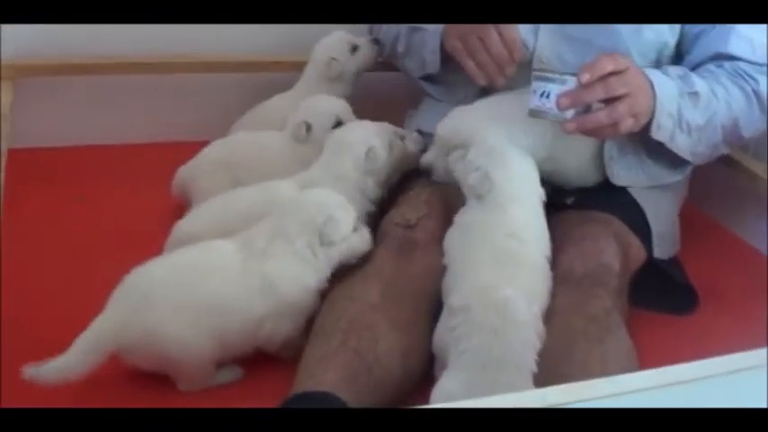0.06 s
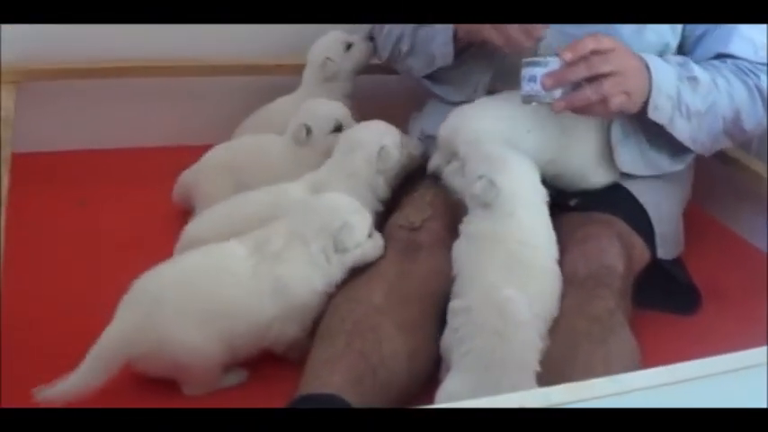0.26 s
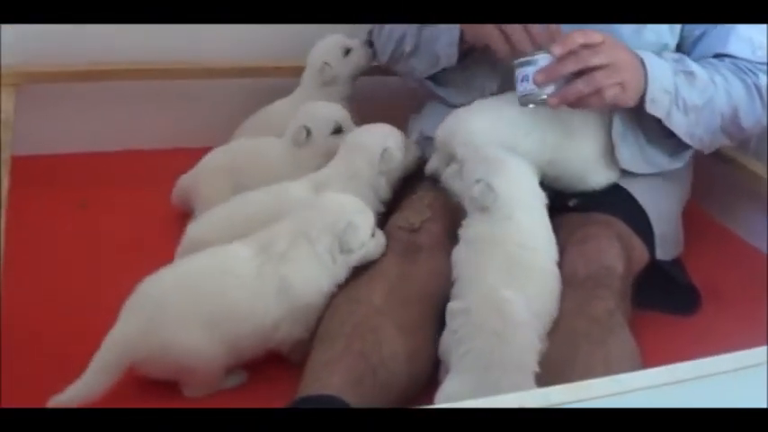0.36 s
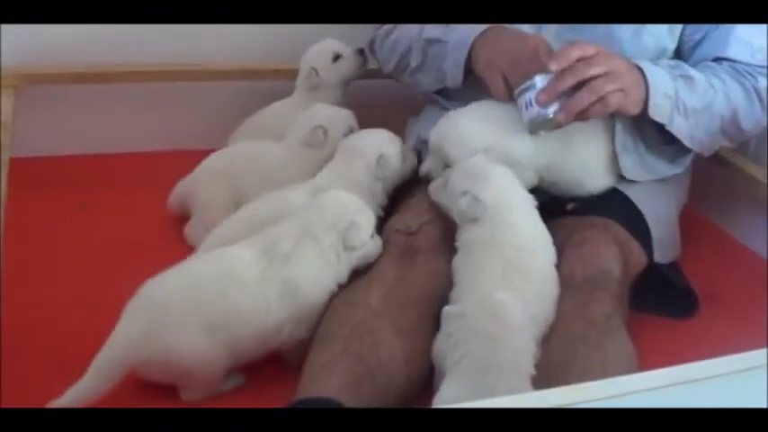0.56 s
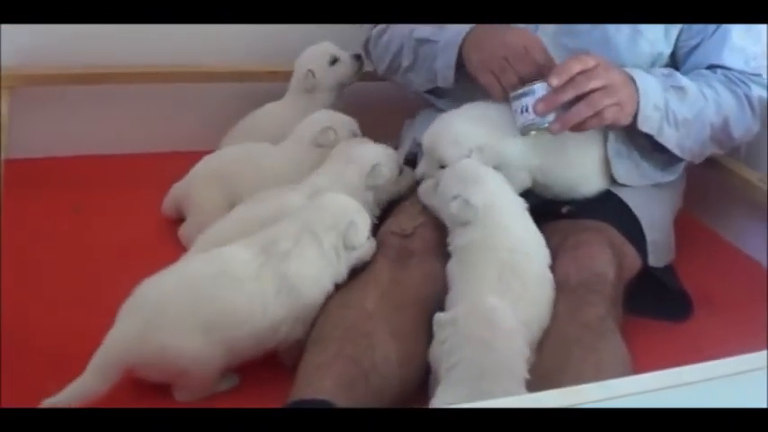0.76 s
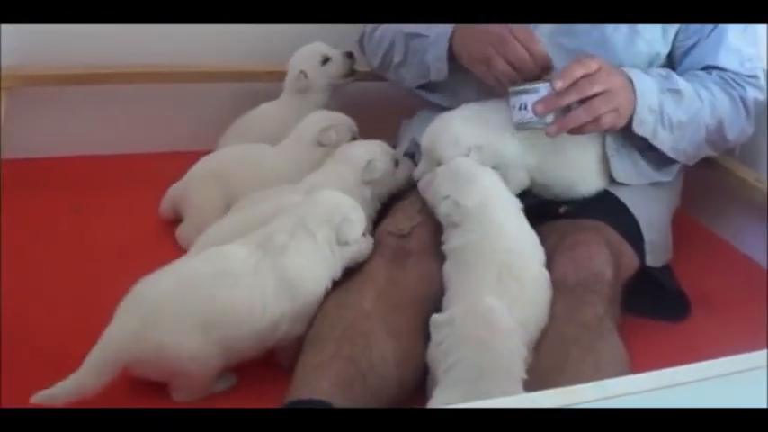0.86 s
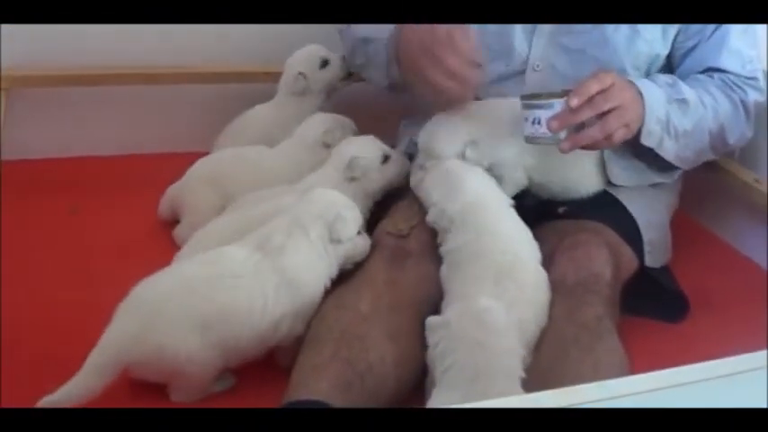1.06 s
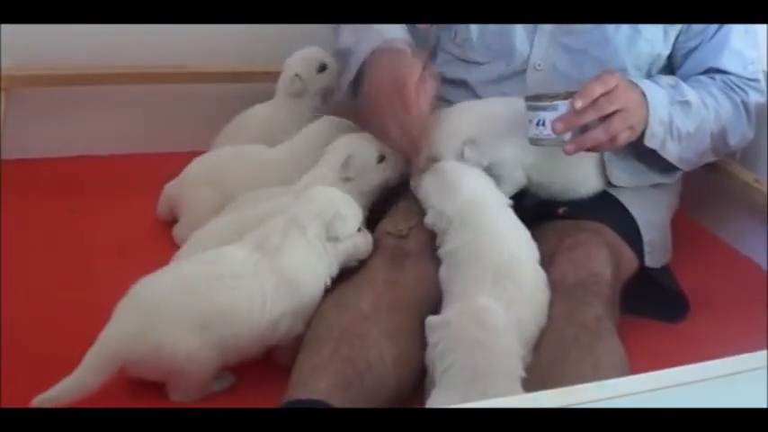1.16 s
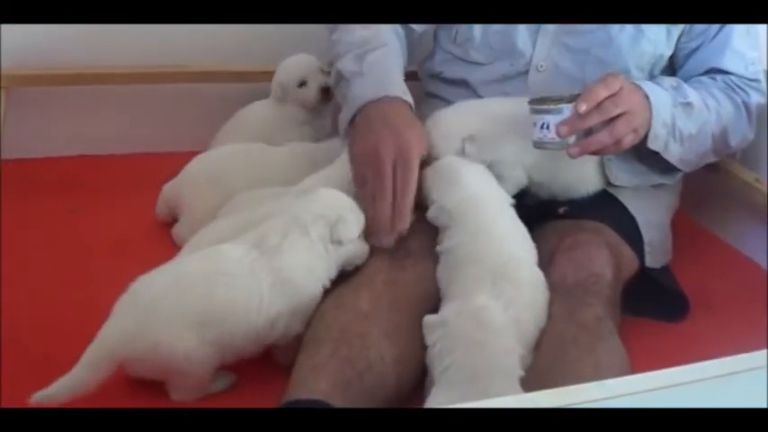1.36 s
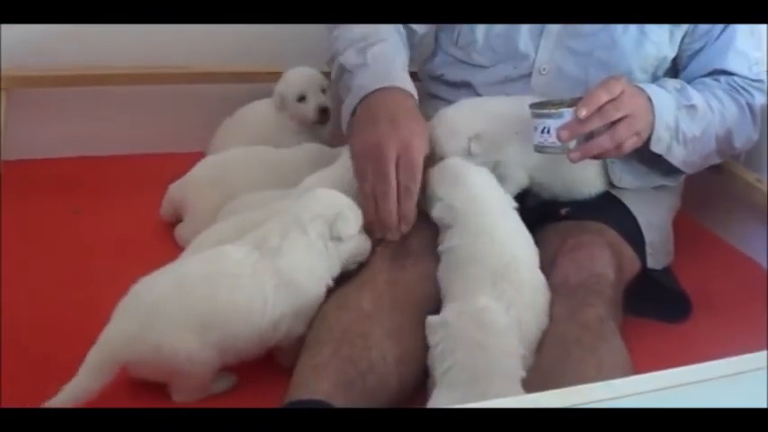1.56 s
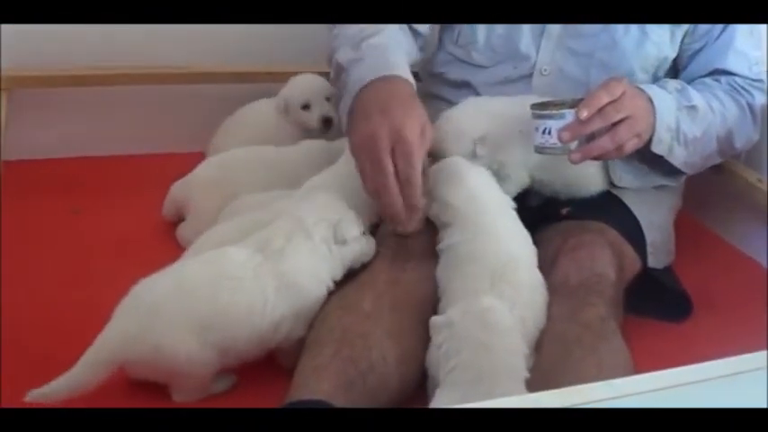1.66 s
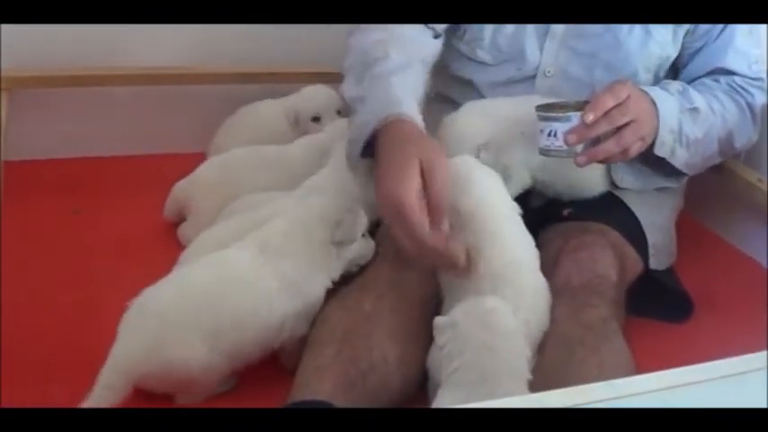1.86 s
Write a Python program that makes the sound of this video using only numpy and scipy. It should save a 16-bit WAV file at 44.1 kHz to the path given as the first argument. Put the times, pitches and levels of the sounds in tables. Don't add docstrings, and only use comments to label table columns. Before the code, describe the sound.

Puppies give four close, high whines, the third a loud open yelp, with brief distant whimpers before and after; soft paw scuffs, thumps and lip clicks in a reverberant room, with steady microphone hiss.

```python
import sys
import numpy as np
from scipy import signal
from scipy.fft import rfft, irfft
from scipy.io import wavfile
from scipy.ndimage import uniform_filter1d

SR = 44100
rng = np.random.default_rng(int(sys.argv[2]) if len(sys.argv) > 2 else 0)


def convert_level_to_amplitude(level_db):
    exponent = np.asarray(level_db, float) / 20
    return 10 ** exponent


def wav_record(signal):
    frames = np.transpose(np.atleast_2d(signal))
    bounded = np.clip(frames, -1, 1)
    quanta = np.round(bounded * 32767).astype(np.int16)
    wavfile.write(sys.argv[1], SR, quanta)


N = 83790

# [t/s, f/Hz, level/dB, mouth opening/0-1]
CRY_1 = [
    (.213, 1036, -43, 0.9),
    (0.229, 1025, -33, 0.63),
    (0.246, 1033, -24, 0.73),
    (0.269, 1121, -27, 0.91),
    (0.289, 1120, -27, 0),
    (0.308, 1143, -35.5, 0.03),
    (0.334, 1155, -41, 0.3),
    (.35, 1017, -33.5, .1),
]
CRY_2 = [
    (.478, 1041, -37, 0.68),
    (0.499, 1040, -32, 0.77),
    (.536, 1233, -25, 1.0),
    (0.56, 1222, -24.5, 0.27),
    (.585, 1215, -28, 0.47),
    (0.607, 1123, -33, 0.3),
    (.64, 1057, -31, 0.076),
]
YELP_3 = [
    (.787, 1056, -47, 0.23),
    (0.804, 1047, -31.5, 0.5),
    (.828, 1161, -27, 0.83),
    (.852, 1209, -18.5, 0.96),
    (0.906, 1220, -15.5, 0.8),
    (.925, 1166, -26, 0.84),
    (0.944, 1118, -24, 0.68),
    (0.987, 1090, -32, 0.72),
    (1.02, 1009, -34, 0.32),
]
CRY_4 = [
    (1.178, 1004, -46.5, 0.84),
    (1.199, 990, -38.5, 1.34),
    (1.225, 1012, -34, 0.88),
    (1.25, 1001, -30, 0.97),
    (1.27, 926, -26.5, 0.85),
    (1.289, 839.3, -29, 0.7),
    (1.308, 798.8, -35, .3),
    (1.335, 815, -34, 0.05),
]
CRY_PANS_DB = [6.5, 5.4, 3.6, 7.6]
CRY_ROUGHNESS = [0.099, 0.11, 0.031, 0.047]
# [t/s, f/Hz, level/dB]
FAR_WHIMPERS = [
    [(.01, 1040, -43), (.017, 985, -37.5), (.026, 799, -33.5), (.045, 775, -45), (.065, 824, -42),
     (.082, 780, -43)],
    [(1.551, 764, -38), (1.568, 891.3, -32.5), (1.59, 901.7, -32.5), (1.6, 824.5, -35), (1.612, 704, -37.5),
     (1.622, 670, -53)],
    [(1.825, 787, -31), (1.838, 890, -38.5), (1.848, 791, -38), (1.857, 705, -37), (1.87, 670, -46)],
]

# [f/Hz, level/dB]
THROAT_SHUT = [(800, 1), (1200, -4), (2200, -21), (4000, -32), (12000, -35.5)]
# [f/Hz, level/dB]
THROAT_OPEN = [(1100, -3.5), (2200, 0), (3500, 2.5), (4500, 8), (5800, 10.5), (7000, -7.5), (12000, -39)]
# [f/Hz, level/dB]
THROAT_WIDE = [(1200, -25), (2430, -9.5), (3600, -6), (4860, -1), (6000, -5), (7300, -27), (9700, -30.5),
               (11000, -41)]
# [f/Hz, level/dB]
THROAT_NASAL = [(1000, -8.5), (2000, -10.5), (3000, -8.5), (4000, 2.5), (5000, 2.5), (6000, -1.5),
                (9000, -32), (12000, -35)]
# [f/Hz, level/dB]
THROAT_FAR = [(800, -0.5), (1700, -0.5), (2600, -10), (6000, -25), (12000, -58)]
# [f/Hz, width/Hz, level/dB]
PEAKS_OPEN = [(3340, 81, 9.2), (5630, 250, 6.4), (6270, 210, 7.6)]
# [f/Hz, width/Hz, level/dB]
PEAKS_ROUND = [(3600, 210, 7.5), (6000, 220, 6.6)]
# [f/Hz, width/Hz, level/dB]
PEAKS_WIDE = [(2460, 146, 11), (3560, 205, 6.5), (5090, 290, 10.5), (7330, 300, 12), (9770, 260, 7)]
# [f/Hz, width/Hz, level/dB]
PEAKS_NASAL = [(4110, 160, 3.37)]

# [t/s, length/s, level/dB, tilt/dB per octave]
PAW_SCUFFS = [
    (0.29, 0.051, -35, 1.5),
    (0.579, 0.038, -37.5, 1.5),
    (0.719, 0.033, -48.5, -6),
    (0.847, 0.023, -37, 4),
    (1.037, 0.015, -31, 1),
    (1.263, 0.09, -41.5, 2.5),
]
# [f/Hz, level/dB]
GRIT_SPECTRUM = [(100, -20.5), (300, 0), (1500, -14), (4600, -2.5), (7000, -18), (15000, -37)]
# [t/s, level/dB, treble/dB per octave]
FLOOR_THUMPS = [
    (.445, -39.5, -4.5),
    (.655, -62, 3),
    (.99, -37.5, -9),
    (1.07, -43.5, -5),
]
# [f/Hz, level/dB, t60/s]
BOARD_MODES = [(179.3, -0.5, 0.45), (217, 1, 0.25), (245, -2.5, 0.17), (300, 7.5, 0.12),
               (408.4, 9.5, 0.091), (563, 2, 0.16)]
# (t/s, length/s, level/dB, first f/Hz, last f/Hz)
LOW_GLIDE = (1.6, 0.06, -43, 195, 249)
# [t/s, peak level/dB, f/Hz]
LIP_CLICKS = [(0.0667, -40.5, 7000), (0.128, -43.5, 8250), (0.1344, -40, 8140), (0.3348, -33, 4700),
              (0.5084, -38, 5920), (0.48, -38, 1500), (0.5656, -30.5, 7950), (0.587, -28, 3500),
              (0.598, -28, 5070), (1.1605, -43, 6000), (1.177, -34, 4000), (1.5174, -49, 9240),
              (1.665, -51, 4200), (1.4174, -35, 7460), (1.5561, -36, 7000), (1.7534, -37, 6260)]
# [t/s, length/s, level/dB, first f/Hz, last f/Hz]
NOSE_WHISTLES = [
    (1.33, 0.13, -49.5, 13700, 14200),
    (1.496, 0.17, -56, 14000, 15260),
    (1.74, .07, -51, 13800, 13800),
    (1.007, 0.017, -43, 12000, 11200),
    (1.606, 0.013, -40.5, 12300, 11650),
    (1.858, 0.014, -43, 12100, 11700),
]

# [f/Hz, level/dB]
HISS_SPECTRUM = [(15, -47), (25, -23), (88, -7.5), (492, -14), (963, -4.5), (1190, -10.5), (6140, -13),
                 (14100, -30.5), (15300, -30)]
# [f/Hz, level/dB]
LOW_HUMS = [(69, -70), (100, -61.5)]
# [f/Hz, likeness/0-1]
HISS_LIKENESS = [(60, 1), (180, 0.8), (550, 0.36), (1650, 0.14), (4970, 0.062), (15000, 0.86)]
# [f/Hz, phase/rad]
PORT_PHASE = [(30, 0.011), (1500, 0.16), (3300, 1.4), (4300, 0.84), (4900, 2.22), (5500, 5.66), (6400, 5.1),
              (10200, 5.2)]
# [f/Hz, level/dB]
WALL_RETURN = [(200, -3.5), (1000, 2), (2500, -2.5), (6000, -2.5), (12000, 8.5)]
# [f/Hz, t60/s]
ROOM_T60 = [(200, 0.89), (1000, 0.5), (2500, 0.44), (6000, 0.42), (12000, 0.13)]
# [f/Hz, level/dB, t60/s]
STANDING_WAVES = [(1004, -1.5, 0.33), (908, -12.5, 0.56), (1107, -22, 0.6), (1222, -14.5, 0.38),
                  (826, -10, 0.37), (757, -11, 0.37)]

JITTER, EDGE_S, BREATH_DB = 0.0048, 0.0037, -24
WHIMPER_ROUGHNESS, WHIMPER_WET_DB, SMALL_WET = 0.17, 1.5, 0.36
CLICK_DB, CLICK_WIDTH_HZ, CLICK_DECAY_S = -1.5, 3800, 0.0034
HISS_DB, WHINE_HZ, WHINE_DB, HISS_LOW_CUT_HZ = -43.5, 15625, -61.5, 46
ROOM_DB, EAR_LIKENESS, EARLY_DB, EARLY_S = 0.37, 0.5, 2.5, 0.031
BUILD_S, STANDING_BUILD_S = 0.021, 0.053


def read(points, hz):
    f, value = np.transpose(points)
    return np.interp(np.log(hz + 1), np.log(f + 1), value)


def evened(x):
    return x / np.sqrt(np.mean(x ** 2) + 1e-20)


def add(mix, start_s, sound):
    part = mix[..., max(round(start_s * SR), 0):][..., :sound.shape[-1]]
    part += sound[..., :part.shape[-1]]


def coloured(x, gain):
    return irfft(rfft(x) * gain(np.fft.rfftfreq(x.shape[-1], 1 / SR)), x.shape[-1])


def hiss():
    frames, hz = N // 128 + 5, np.fft.rfftfreq(512, 1 / SR)
    a, b, c, d, patches = rng.standard_normal((frames, 257, 5)).T
    patches = uniform_filter1d(patches, size=8, axis=0)
    patches = evened(uniform_filter1d(patches, size=14, axis=1))
    flicker = evened(uniform_filter1d(rng.standard_normal(frames), size=3))
    same = read(HISS_LIKENESS, hz)[:, None]
    left = a + 1j * b
    right = same * left + np.sqrt(1 - same ** 2) * (c + 1j * d)
    level_db = read(HISS_SPECTRUM, hz)[:, None] + 3.4 * patches + 1.7 * flicker * (hz[:, None] / 16000)
    spectrum = np.array([left, right]) * convert_level_to_amplitude(level_db)
    noise = signal.istft(spectrum, nperseg=512, noverlap=384)[1][:, :N]
    t = np.arange(N) / SR
    hums = sum(convert_level_to_amplitude(db) * np.sin(2 * np.pi * f * t) for f, db in [*LOW_HUMS, (WHINE_HZ, WHINE_DB)])
    return convert_level_to_amplitude(HISS_DB) * evened(noise) + hums


def voice(hz, level_db, mouth, rough, throat, peaks=()):
    n = len(hz)
    jitter = evened(uniform_filter1d(rng.standard_normal(n), size=150))
    turns = np.cumsum(hz * (1 + JITTER * jitter)) / SR
    flutter = uniform_filter1d(rng.standard_normal((11, 2, n)), size=120, axis=2) * np.sqrt(120)
    tone, power = np.zeros(n), 0
    for k in range(1, 12):
        gain_db = (1.5 - mouth) * read(THROAT_SHUT, k * hz) + mouth * read(throat, k * hz)
        for f, width_hz, db in peaks:
            gain_db = gain_db + db / (1 + ((k * hz - f) / width_hz) ** 2)
        gain = convert_level_to_amplitude(gain_db)
        share = np.clip(rough * k ** 0.48, 0, 1)
        smear = 1 - share + share * (flutter[k - 1, 0] + 1j * flutter[k - 1, 1])
        tone = tone + gain * (smear * np.exp(2j * np.pi * k * turns)).real
        power = power + gain ** 2 / 2
    breath = evened(coloured(rng.standard_normal(n),
                             lambda f: convert_level_to_amplitude(read(throat, f)) * f ** 2 / (f ** 2 + 1500 ** 2)))
    t = np.arange(n) / SR
    fade = np.clip(np.minimum(t, t[-1] - t) / EDGE_S, 0, 1)
    return convert_level_to_amplitude(level_db) * (tone / np.sqrt(power) + convert_level_to_amplitude(BREATH_DB) * mouth * breath) * fade


def whimpers():
    out = np.zeros(N)
    for rows in FAR_WHIMPERS:
        s, hz, db = np.transpose(rows)
        t = np.arange(s[0], s[-1], 1 / SR)
        note = voice(np.interp(t, s, hz), np.interp(t, s, db), 1.0, WHIMPER_ROUGHNESS, THROAT_FAR)
        add(out, s[0], note)
    return out


def lip_clicks():
    out, t = np.zeros(N), np.arange(1024) / SR
    for s, db, hz in LIP_CLICKS:
        puff = coloured(rng.standard_normal(1024), lambda f: 1 / (1 + ((f - hz) / CLICK_WIDTH_HZ) ** 2))
        add(out, s, convert_level_to_amplitude(db + CLICK_DB) * evened(puff) * np.exp(-t / CLICK_DECAY_S))
    return out


def cries():
    out = np.zeros((2, N))
    calls = (CRY_1, CRY_2, YELP_3, CRY_4)
    throats = (THROAT_OPEN, THROAT_OPEN, THROAT_WIDE, THROAT_NASAL)
    resonances = (PEAKS_OPEN, PEAKS_ROUND, PEAKS_WIDE, PEAKS_NASAL)
    for rows, throat, peaks, rough, pan_db in zip(calls, throats, resonances, CRY_ROUGHNESS, CRY_PANS_DB):
        s, *controls = np.transpose(rows)
        t = np.arange(s[0], s[-1], 1 / SR)
        hz, level_db, mouth = (np.interp(t, s, c) for c in controls)
        cry = voice(hz, level_db, mouth, rough, throat, peaks)
        add(out, s[0], cry * convert_level_to_amplitude(np.array([[pan_db / 2], [-pan_db / 2]])))
    return out


def scuffs():
    out = np.zeros(N)
    for s, length_s, db, tilt_db in PAW_SCUFFS:
        u = np.linspace(0, 1, round(length_s * SR))
        grit = rng.standard_normal(4096) * convert_level_to_amplitude(2.66 * rng.exponential(1, 4096))
        grit = evened(coloured(
            grit, lambda f: convert_level_to_amplitude(read(GRIT_SPECTRUM, f) + tilt_db * np.log2(f / 1000 + 0.12))))
        add(out, s, convert_level_to_amplitude(db) * grit[:len(u)] * np.sin(np.pi * u ** 0.69) ** 0.21)
    return out


def floor_board():
    out, t = np.zeros(N), np.arange(SR // 2) / SR
    for s, db, treble_db in FLOOR_THUMPS:
        ring = np.zeros(len(t))
        for hz, mode_db, t60_s in BOARD_MODES:
            decay_db = mode_db + treble_db * np.log2(hz / 200) - 60 * t / t60_s
            ring += convert_level_to_amplitude(decay_db) * np.sin(2 * np.pi * hz * t)
        add(out, s, convert_level_to_amplitude(db) * ring * np.minimum(t / 0.011, 1))
    s, length_s, db, first_hz, last_hz = LOW_GLIDE
    u = np.linspace(0, 1, round(length_s * SR))
    turns = np.cumsum(first_hz + (last_hz - first_hz) * u) / SR
    add(out, s, convert_level_to_amplitude(db) * np.sin(np.pi * u) * np.sin(2 * np.pi * turns))
    return out


def nose_whistles():
    out = np.zeros(N)
    for s, length_s, db, first_hz, last_hz in NOSE_WHISTLES:
        u = np.linspace(0, 1, round(length_s * SR))
        waver_hz = 120 * evened(uniform_filter1d(rng.standard_normal(8192), size=100))[:len(u)]
        hz = first_hz + (last_hz - first_hz) * np.sin(1.6 * u) + waver_hz
        add(out, s, convert_level_to_amplitude(db) * np.sin(np.pi * u ** 0.86) * np.sin(2 * np.pi * np.cumsum(hz) / SR))
    return out


def room(x):
    taps = np.zeros((2, SR))
    at = np.arange(200, SR - 20, 20) + rng.integers(0, 20, (2, (SR - 201) // 20))
    np.put_along_axis(taps, at, rng.choice([-1., 1.], at.shape), 1)
    taps[1] = EAR_LIKENESS * taps[0] + np.sqrt(1 - EAR_LIKENESS ** 2) * taps[1]
    t = np.arange(SR) / SR
    taps = taps * (1 + convert_level_to_amplitude(EARLY_DB) * np.exp(-t / EARLY_S) - np.exp(-t / BUILD_S))
    hz, frame_s, z = signal.stft(taps, SR, nperseg=256)
    z = z * convert_level_to_amplitude(-60 * frame_s / read(ROOM_T60, hz)[:, None])
    tail = signal.istft(z, SR, nperseg=256)[1]
    tail = tail / np.linalg.norm(tail[0])
    t = np.arange(tail.shape[1]) / SR
    phases = 2 * np.pi * rng.random((len(STANDING_WAVES), 2, 1)) * np.array([[1], [0]])
    for (f, db, t60_s), phase in zip(STANDING_WAVES, phases):
        swell = convert_level_to_amplitude(-60 * t / t60_s) * (1 - np.exp(-t / STANDING_BUILD_S))
        ring = swell * np.sin(2 * np.pi * f * t + 0.21 * phase)
        tail = tail + convert_level_to_amplitude(db - 16.5) * ring / np.linalg.norm(ring[0])
    x = coloured(x, lambda f: convert_level_to_amplitude(read(WALL_RETURN, f)))
    return convert_level_to_amplitude(ROOM_DB) * signal.fftconvolve(x[None], tail, axes=1)[:, :N]


def scene():
    floor = coloured(hiss(), lambda f: 1 / (1 + (HISS_LOW_CUT_HZ / (f + 1)) ** 2))
    far, near = whimpers(), cries()
    small = lip_clicks() + scuffs() + floor_board() + nose_whistles()
    heard = near + far + small + room(near.mean(0) + convert_level_to_amplitude(WHIMPER_WET_DB) * far + SMALL_WET * small)
    turn = np.array([[.5j], [-.5j]])
    return coloured(heard, lambda f: np.exp(turn * read(PORT_PHASE, f))) + floor


def band_limit(x):
    return signal.sosfilt(signal.butter(12, 15940, fs=SR, output="sos"), x)


def record(dry):
    return band_limit(dry)


dry = scene()
out = record(dry)
wav_record(out)
```